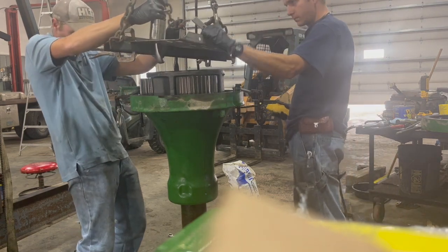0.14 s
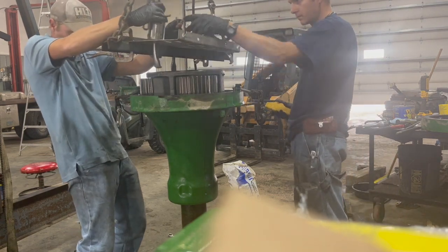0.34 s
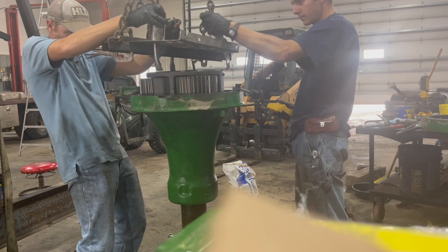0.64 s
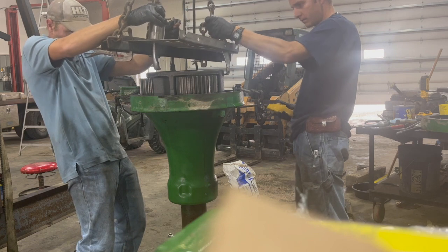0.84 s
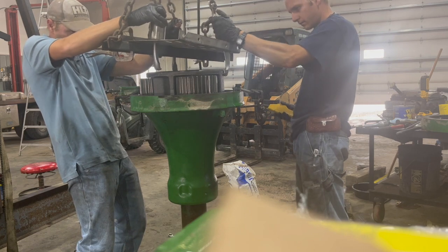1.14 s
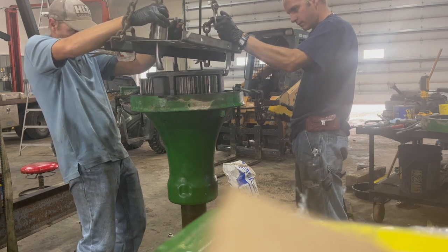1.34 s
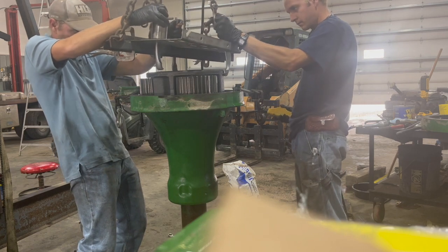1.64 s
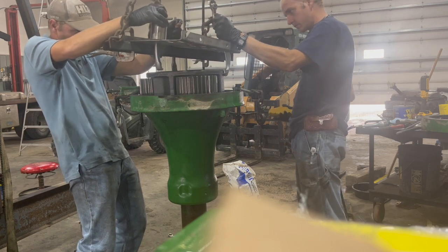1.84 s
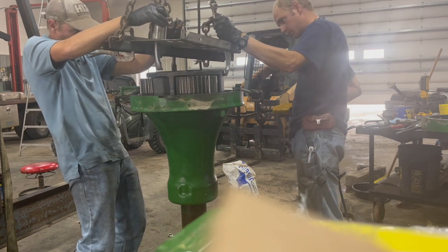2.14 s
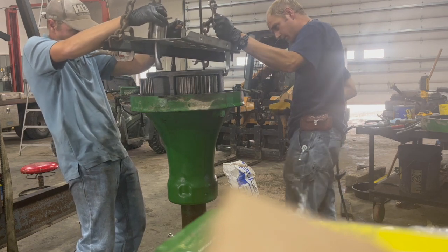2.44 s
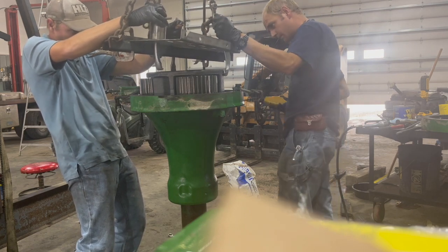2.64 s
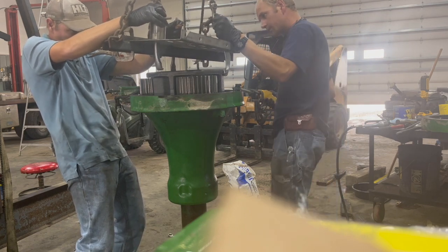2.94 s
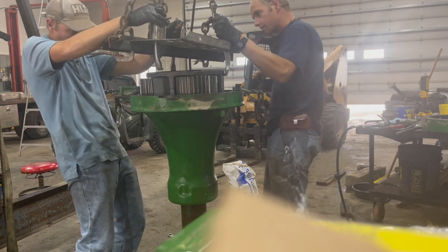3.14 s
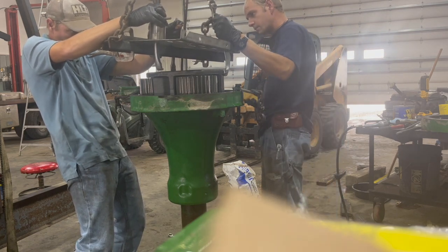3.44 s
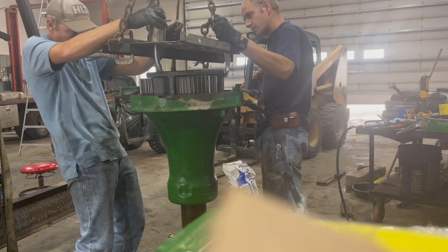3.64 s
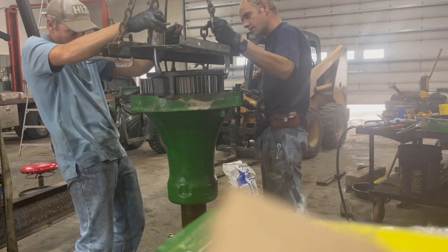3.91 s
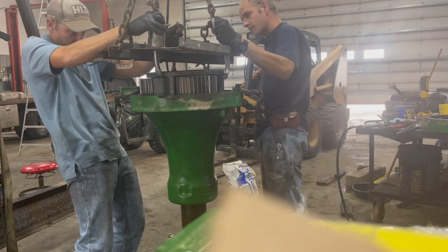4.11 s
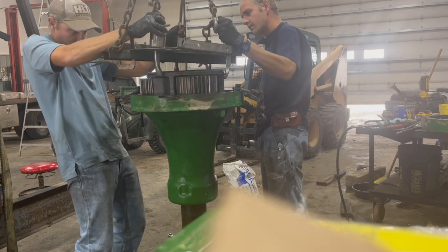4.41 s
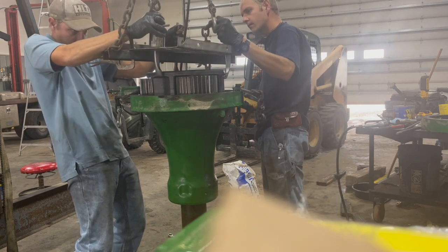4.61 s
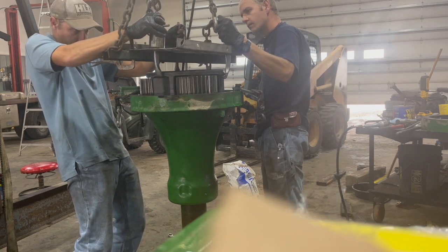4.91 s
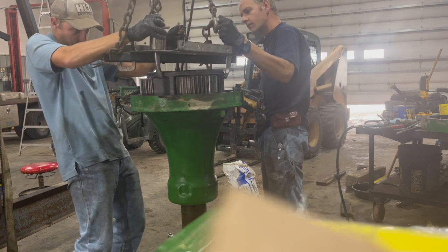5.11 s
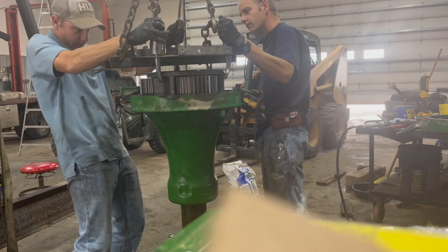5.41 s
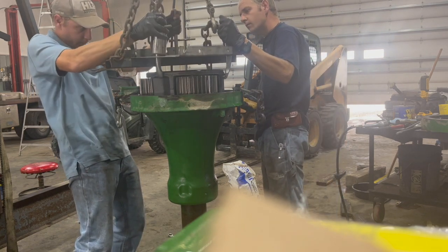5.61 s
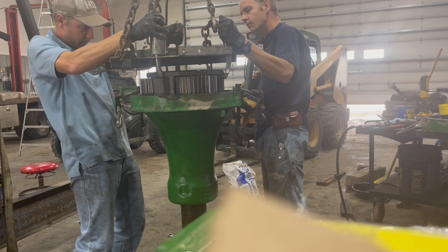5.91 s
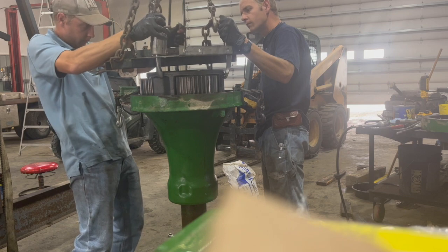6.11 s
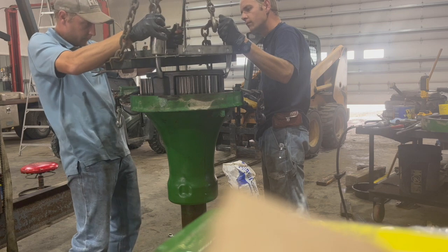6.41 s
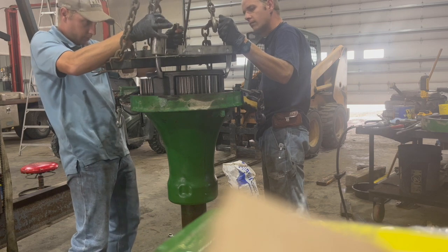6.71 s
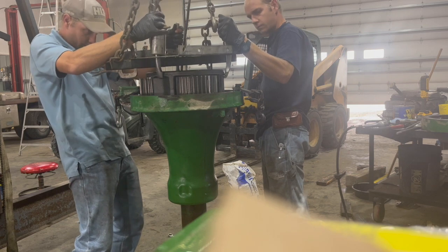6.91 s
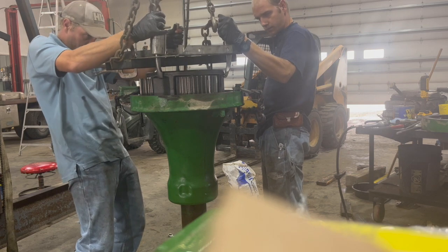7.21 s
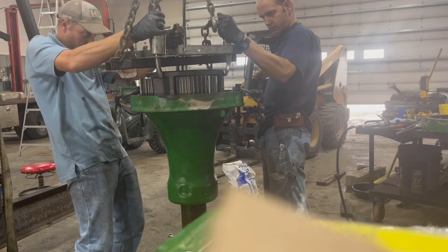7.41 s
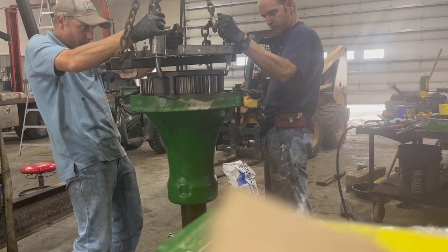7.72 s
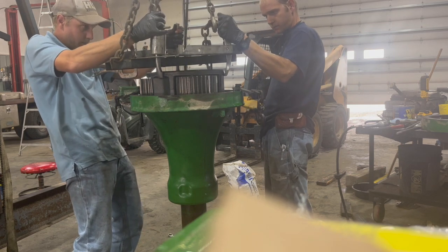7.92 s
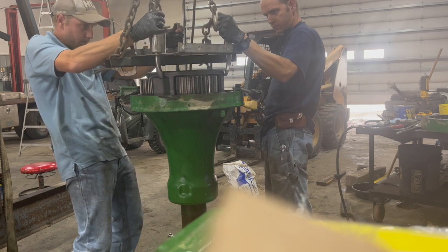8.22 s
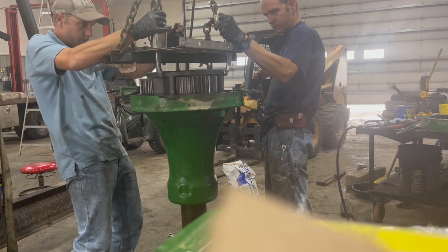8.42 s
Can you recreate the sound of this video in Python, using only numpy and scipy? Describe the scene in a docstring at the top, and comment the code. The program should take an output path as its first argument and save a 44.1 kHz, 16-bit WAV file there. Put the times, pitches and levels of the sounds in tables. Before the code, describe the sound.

Steel scrapes and sharp clanks with chain clinks, between three brief, harsh motor-gear rattles of a chain hoist, ringing in a large hall.

```python
"""A heavy steel part is lowered by short runs of an electric chain hoist in a large metal-walled workshop.
First the steel frame grinds and knocks and chain links clink, as damped modes driven by rough contact.
Then boots and slack chain scuff (filtered grains), the brake clacks (noise bursts) and the gears rattle
(tooth impacts through resonances) in three runs, the last still going at the end, with grinds, knocks and
clinks around them. Air noise and a rumble run throughout; the hall's mid range rings for about 1.5 s."""
import sys
import numpy as np
from scipy import signal
from scipy.fft import rfft, irfft
from scipy.io import wavfile
from scipy.ndimage import uniform_filter1d

SR = 44100
rng = np.random.default_rng(int(sys.argv[2]) if len(sys.argv) > 2 else 0)


def dump(signal):
    """Clip the signal to [-1, 1] and save it as 16-bit WAV at the path in sys.argv[1]."""
    limited = np.clip(np.atleast_2d(signal).T, -1, 1)
    pcm = np.round(limited * 32767).astype(np.int16)
    wavfile.write(sys.argv[1], SR, pcm)


N = 377055

# Levels in the tables are relative: the functions add gains of their own.
# air noise spectrum: [pitch_hz, density_db_per_hz]
AIR = [(53, -31), (90, 7.5), (421, 1), (1500, -1.5), (2300, -26.5), (5110, -23), (6650, -35), (8310, -12),
       (11500, -18.5), (15000, -95), (22000, -120)]
# hall by band: [pitch_hz, t60_s, tail_energy_db, left_right_likeness]
HALL = [(60, 6.8, -1, .95), (256.4, 2.38, 5, 0.69), (660, 1.44, 7.5, -0.033), (1960, 1.68, 2.5, 0.41),
        (4600, 1.35, 9, 0.27), (5920, 1.05, 9.5, -0.2), (8700, 0.67, 5, 0.082), (11700, 0.19, -1, 2),
        (14800, 0.26, 17.5, -1)]
# wall sheets, which ring on longer than the air: [pitch_hz, width_hz, level_db]
CLADDING = [(1526, 80, -8.5), (1678, 88, 0)]
# boots, cloth and slack chain scuffing: [start_s, length_s, level_db, fading_db_per_s]
SCUFFS = [(0, 0.21, -62, 7), (2.02, 0.065, -66, 30), (2.24, 0.027, -68, 30), (2.629, 0.03, -54, -92.5),
          (2.864, 0.083, -68.5, 97.5), (3.12, 0.08, -38, 163.5), (4.185, 0.0047, -39.5, 293),
          (4.235, 0.26, -50, 8.5), (5.595, 0.17, -43.5, 47.5), (5.811, 0.094, -41.5, -74),
          (6.582, 0.12, -60.5, -1), (6.81, 0.11, -60, 43)]
# spectrum of scuffing: [pitch_hz, density_db_per_hz]
SCUFF_SPECTRUM = [(180, -64.5), (300, -20.5), (478, -11), (787, -16.5), (946, -4.5), (1720, -7.5),
                  (9390, -22.5), (12700, -23), (16000, -36)]
# metal parts touching, chain links and hooks but also frame parts that ring low: [start_s, snap_peak_db,
# ring_pitch_hz, ring_over_snap_db, t60_s]
CLINKS = [(0.377, -30.5, 11000, -2, 0.034), (0.381, -34.5, 7860, 5.5, 0.018), (0.386, -43, 4120, 11, 0.067),
          (0.517, -30.5, 5490, -4.5, 0.086), (0.469, -48.5, 3070, 0, 0.18), (.757, -41, 3620, 5, 0.27),
          (0.757, -40, 4330, 6.5, 0.066), (0.956, -13, 5680, -0.5, 0.01), (0.818, -50.5, 1662, 20.5, 0.21),
          (0.961, -53, 1540, 21, 0.2), (3.947, -33, 3120, -2.5, 0.04), (3.969, -16, 3250, -19.5, 0.052),
          (4.111, -21.5, 8210, -1.5, 0.015), (4.143, -20.5, 9420, -10.5, 0.033),
          (4.196, -20.5, 8760, -8.5, 0.035), (4.222, -28, 8000, -25.5, 0.035),
          (4.265, -25, 9100, -21.5, 0.043), (4.388, -34, 9100, -15, 0.03), (4.426, -31.5, 7860, -8, 0.012),
          (4.558, -28, 5420, -9.5, 0.042), (5.228, -26, 3470, -2.5, 0.031), (5.295, -26.5, 3200, 2, 0.046),
          (5.314, -14.5, 9100, -27, 0.033), (5.347, -16.5, 3480, -14.5, 0.039),
          (5.895, -19.5, 7800, -17.5, 0.068), (5.996, -13, 10200, -10.5, 0.04),
          (5.996, -12, 7970, -2, 0.02), (6.006, -18, 8950, -6, 0.045), (5.999, -50, 3350, 6, 0.25),
          (6.002, -44.5, 3740, 3.5, 0.2), (6.001, -51.5, 4130, 7, 0.17), (6.003, -44, 5280, 9.5, .3),
          (7.269, -53.5, 8400, 8.5, 0.092), (7.273, -52, 1595, 20.5, 0.18),
          (7.274, -59.5, 1314, 21.5, 0.43), (7.273, -52.5, 472, 16, 0.23), (7.275, -68, 2240, 10, 0.26),
          (7.276, -67, 4360, 12, 0.26), (7.999, -47, 5370, -11, .05), (8.4, -16, 5230, -59, 0.032),
          (8.442, -35, 7900, 4, 0.037), (8.496, -11, 4050, -15, 0.01)]
# steel frame grinding on its seat: [peak_s, peak_db, swell_ms, fall_ms, mode_tilt_db_per_octave]
GRINDS = [(.04, -47, 1000, 54, -6), (0.199, -22.5, 108, 40, 1.5), (.388, -28.5, 50, 32, 5.5),
          (0.492, -30.5, 83, 67, -5.5), (0.512, -23, 37, 58, 4), (0.711, -19, 85, 65, 4),
          (.78, -37, 14, 27, 10), (2.12, -53.5, 50, 40, -1), (5.111, -17.5, 45, 38, -1),
          (5.542, -13.5, 93, 38, 6), (6.029, -16, 48, 26, -1), (7.271, -25.5, 53.6, 29, -1.5),
          (8.128, -23.5, 47, 260, -7)]
# knocks on the frame: [start_s, peak_db, struck_pitch_hz, length_ms, bright_tick_db]
KNOCKS = [(0.115, -42, 610, 5.1, -19), (0.345, -21.5, 2300, 9.5, -26), (0.463, -15, 710, 7.7, -27.5),
          (0.465, -12.5, 2300, 4.1, -24), (0.485, -24.5, 680, 6.6, -31), (0.505, -13, 690, 21, -17),
          (0.715, -14, 2240, 25, -31), (0.752, -3.5, 2230, 16, -14.5), (0.961, -5.5, 840, 10.6, -19),
          (1.355, -27.5, 2300, 25, -33), (2.43, -61, 3870, 10.6, -46), (2.606, -26, 1675, 8.4, -34),
          (3.118, -52, 1210, 9.9, -40.5), (4.988, -9.5, 1270, 10, -29.5), (5.345, -1, 2240, 19, -13),
          (5.538, 2, 2020, 19.2, 4), (5.89, 7.5, 1820, 10.5, -12), (5.994, 2, 3920, 6.6, -2),
          (5.996, 1.5, 2100, 12.3, -13), (6.544, -13, 2370, 8.9, -28.5), (6.563, -26, 900, 6.9, -30),
          (6.77, -20.5, 2000, 2.7, -24), (7.234, -20.5, 1070, 13, -22), (7.27, -11, 2140, 10, -19),
          (8.496, 1.5, 2330, 8.8, -2.5)]
# frame modes, damped by hands and seat: [pitch_hz, level_db, t60_s]
FRAME_MODES = [(259.5, -25, 0.071), (478, -21.5, 0.064), (587, -11.5, 0.06), (634, -15.5, 0.032),
               (689, -3, 0.055), (794, -17.5, 0.12), (1000, -6, 0.015), (1170, -5.5, 0.033),
               (1282, 1, 0.018), (1610, -6, .025), (1800, -7.5, 0.019), (2032, -6, 0.017),
               (2133, -11, 0.024), (2213, -3.5, 0.023), (2300, -9.5, 0.023), (2570, -19.5, 0.016),
               (3030, -9, 0.012), (3650, -14.5, 0.03), (3950, -20.5, 0.022), (4450, -17, 0.034),
               (5260, -17, 0.018)]
# brake and other dull blows: [start_s, thud_peak_db, snap_db, thump_pitch_hz, thump_db, length_ms]
THUDS = [(2.61, -45.5, -53, 360, -60, 69), (3.095, -41, -32, 183, -23, 30),
         (3.395, -13.5, 0.5, 341, -15, 41), (4.981, -21.5, -10, 431, -35.5, 94),
         (8.036, -10.5, 4, 347, -14.5, 26.5)]
# resonances of a thud's body: [pitch_hz, width_hz, level_db]
THUD_BODY = [(210, 210, -4.5), (340, 330, 2.5), (454, 140, -1), (760, 140, -25), (1290, 160, -27)]
# hoist runs: [start_s, stop_s, rattle_db, surge_db, upper_over_rattle_db, upper_drift_db_per_s,
#              hum_db, boom_over_rattle_db, boom_drift_db_per_s]
RUNS = [(3.399, 3.999, -31, 8.5, 2, 14.5, -59, -6.5, -11.5), (5.063, 5.527, -32.5, 7, 8, -27, -47, -10, 8),
        (8.039, 8.593, -30.5, 6, -3.5, -4, -37, -5.5, 5)]
# the load jerking on the gears: [centre_s, added_rattle_db, further_upper_resonance_db]
LURCHES = [(3.49, 2.7, 2), (3.69, 0.44, 2.5), (3.87, 1.8, 2.5), (5.239, 5.6, -1.5), (8.129, 5.9, 2),
           (8.453, 6.7, -5)]
# main, upper and case resonances of the gears: [pitch_hz, width_hz, level_db]
GEARBOX = [(774, 147, 1), (929, 33, 6), (1090, 148, 1), (2056, 470, -6), (2880, 500, -10.5),
           (4560, 930, -14.5), (5760, 1000, -18), (9150, 8400, -26.5)]
UPPER_GEAR = [(1154, 46, -15), (1241, 73, -0.5), (1283, 44, -1.5), (1353.6, 40, 5), (1426, 62, -0.5),
              (1570, 71, -11.5)]
CASE = [(114, 21, -2.5), (247.5, 27.4, -1.5), (354.7, 18.4, 5), (472, 74, -4.5)]
# colour of the output, with a treble dip and a deep gap near 13 kHz: [pitch_hz, level_db]
OUT_COLOUR = [(30, -10.5), (200, 2), (5500, -3.5), (6700, -7), (8000, -1.5), (11000, -5.5), (11800, -19.5),
              (13200, -62.5), (14200, -12), (16000, -3.5)]
# left channel over right: [pitch_hz, difference_db]
SIDES = [(60, 0), (180, -2), (500, 0), (1000, 0.5), (2000, -0.1), (4000, 6), (8000, 0.5)]

AIR_DB = -65.5
# the building rumbles along with the work: level at full scale, share of the swing, smoothing
RUMBLE_DB, RUMBLE_FOLLOWS, RUMBLE_S = -38, 0.4, 0.014
RUMBLE_REST = 3e-6   # power that keeps it going in the pauses
NEAR_T60_S, NEAR_DB = 0.11, -1   # reflections off nearby machines
CLADDING_T60_S = 1.69
CLOSE_WET_DB = -5.5   # frame and chain are nearer than the hoist: less hall
TOUCH_MS = 4.3
LINKS_HZ, LINKS_T60_S, LINKS_DB = (3000, 11500), .007, -19   # the many other links: range, ring, level
TWIN_RATIO, TWIN_DB = 0.975, -7   # every part has a second mode close by, so its ring beats
# loose parts swing and brush, so their ring wavers in level and phase
FLUTTER_DB, FLUTTER_RAD, FLUTTER_S = 5, 1.1, .025
CONTACT_DB = 18   # the surfaces first touch this far below the peak
GRIND_DULLS = 0.55   # tilt lost per dB below the peak
SCRATCH_DB = 19   # toneless part of each contact
TICK_WIDTH = 0.37   # width of a knock's tick over the struck pitch
# from here the frame rests on its seat, which weakens the low modes
SEATED_S, SEATED_BELOW_HZ, SEATED_DB = 5.3, 1250, -7
THUMP_T60_S, THUMP_FROM_HZ, THUMP_SAG_S = .04, 593, 0.0028   # the thump starts at one pitch, glides to its own
SURGE_S, SURGE_MASKS = 0.14, 1   # the surge dies away; share by which the upper resonance holds back
WIND_UP_S, WIND_UP_DB = 0.029, -33   # the hum comes up to strength
STOP_S, STOP_DB, STOP_UPPER_DB = 0.083, 6, -17   # as the brake bites: more rattle, less upper resonance
LURCH_S = 0.027
HUM_HZ = 135.5
SHAFT_HZ, SHAFT_KICK_S = 30.24, 3.445   # motor turns per second; a moment when the tight tooth meets
WANDER_DB, WANDER_S = 3, 0.03   # each upper resonance comes and goes by itself
TOP, CUTOFF_HZ = .9, 16600   # the loudest peaks are rounded; the top is cut


def from_db(db):
    """Decibels are twenty times the logarithm of a gain; this inverts them."""
    return 10 ** (np.asarray(db) / 20)


def rms_one(x):
    """Normalise by the root of the mean power."""
    return x / np.sqrt(np.mean(x ** 2) + 1e-20)


def at_hz(points, hz, axis=1):
    """Interpolate a table column over log frequency, since pitch is heard in ratios."""
    points = np.array(points)
    return np.interp(np.log(hz), np.log(points[:, 0]), points[:, axis])


def strokes(starts, stops, db, fade_s):
    """Amplitude gating: each row of db sounds from start to stop, with linear fades outside."""
    t = np.arange(N) / SR
    total = 0
    for start, stop, row in zip(starts, stops, db):
        total = total + from_db(row) * np.clip(np.minimum(t - start, stop - t) / fade_s + 1, 0, 1)
    return total


def colour(x, points):
    """Minimum-phase filtering: folding the cepstrum puts the response's energy earliest."""
    hz = np.maximum(np.arange(2049) * SR / 4096, 1)
    cepstrum = irfft(np.log(from_db(at_hz(points, hz))))
    cepstrum[1:2048] *= 2
    cepstrum[2049:] = 0
    response = irfft(np.exp(rfft(cepstrum))) * np.ones(np.shape(x)[:-1] + (1,))
    return signal.oaconvolve(x, response, axes=-1)[..., :N]


def resonate(x, peaks):
    """Modal superposition: parallel two-pole resonances with alternating signs."""
    out = 0
    for k, (hz, width, db) in enumerate(peaks):
        r = np.exp(-np.pi * width / SR)
        zeros = (1 - r * r) / 2 * np.array([1, 0, -1])
        poles = [1, -2 * r * np.cos(2 * np.pi * hz / SR), r * r]
        out = out + (-1) ** k * from_db(db) * signal.lfilter(zeros, poles, x + 1e-18)
    return out


def ring(clicks, hz, t60):
    """Impulse response of a damped oscillator: a unit click starts a decaying sine of height 1."""
    r = from_db(-60 / (t60 * SR))
    w = 2 * np.pi * min(hz, .45 * SR) / SR
    return signal.lfilter([0, np.sin(w)], [1, -2 * r * np.cos(w), r * r], clicks + 1e-18)


def grains(per_s, spread_db):
    """Shot noise: random contacts of uneven size, at rms 1."""
    sizes = from_db(spread_db * np.minimum(rng.exponential(1, N), 5)) * rng.choice([-1, 1], N)
    return rms_one(sizes * (rng.random(N) < per_s / SR))


def blows(times, dbs, lengths_ms, rise):
    """Impact envelope: a rise over a share of the length, and a fall of 20 dB per length."""
    out = np.zeros(N)
    ms = np.arange(SR // 4) / SR * 1000
    for s, db, length in zip(times, dbs, np.maximum(lengths_ms, .5)):
        i = round(s * SR)
        envelope = from_db(db - 20 * ms / length) * np.minimum(ms / (rise * length), 1)
        out[i:i + len(ms)] += envelope[:N - i]
    return out


def background(work):
    """Broadband air noise, plus a low rumble modulated by the smoothed power of the work."""
    mid, side = rng.standard_normal((2, N))
    air = rms_one(colour(np.array([mid + 0.33 * side, mid - 0.43 * side]), AIR))
    low_band = signal.butter(2, [48, 85], "band", fs=SR, output="sos")
    low_mid, low_side = signal.sosfilt(low_band, rng.standard_normal((2, N)))
    rumble = rms_one(low_mid + 0.21 * low_side * [[1], [-1]])
    keep = np.exp(-1 / (RUMBLE_S * SR))
    power = signal.lfilter([1 - keep], [1, -keep], np.mean(work ** 2, axis=0)) + RUMBLE_REST
    return from_db(AIR_DB) * air + from_db(RUMBLE_DB) * power ** (RUMBLE_FOLLOWS / 2) * rumble


def hall(close, rings, far):
    """Diffuse-field reverberation: direct sound, near reflections and a tail decaying band by band."""
    t = np.arange(2 * SR) / SR
    edges = 40 * 2 ** np.arange(0, 9.1, .5)   # half octaves
    white = rng.standard_normal((2, 2, len(t)))
    near, tail = np.zeros((2, len(t))), 0
    for k, (low, high) in enumerate(zip(edges, edges[1:])):
        band_pass = signal.butter(2, [low, high], "band", fs=SR, output="sos")
        mid, side = signal.sosfilt(band_pass, white[k % 2])
        t60, tail_db, alike = [at_hz(HALL, np.sqrt(low * high), axis=c) for c in (1, 2, 3)]
        alike = np.clip(alike, -1, 1)
        band = np.sqrt(1 + alike) * mid + np.sqrt(1 - alike) * side * [[1], [-1]]
        band = band * np.sqrt(np.log(1000) / SR)   # with 1/sqrt(t60): energy independent of decay
        near += band * from_db(NEAR_DB - 60 * t / NEAR_T60_S) / np.sqrt(NEAR_T60_S)
        build_up = np.minimum(t / 0.0087, 1)
        tail = tail + band * from_db(tail_db - 60 * t / t60) * build_up / np.sqrt(t60)
    sheets = resonate(white[0], CLADDING) * from_db(-23.0 - 60 * t / CLADDING_T60_S)
    near[:, 0] = 1   # direct sound
    sent = far + from_db(CLOSE_WET_DB) * close
    light = from_db(CLOSE_WET_DB) * rings   # too light to shake the wall sheets
    paths = [(close + rings + far, near[:, :SR // 4]), (sent, tail + sheets), (light, tail)]
    return sum(signal.fftconvolve(x, response, axes=-1)[:, :N] for x, response in paths)


def scuffs():
    """Friction as dense random contacts: fine grit rubbed over concrete and steel."""
    s, length, db, fading = np.transpose(SCUFFS)[..., None]
    level = db - fading * np.clip(np.arange(N) / SR - s, 0, length)
    grit = rms_one(colour(grains(9000, spread_db=9.5), SCUFF_SPECTRUM))
    return strokes(s, s + length, level, fade_s=0.034) * grit


def chain():
    """Impact excitation: each touch snaps, rings one part clearly and shakes many links faintly."""
    s, db, hz, ring_db, t60 = np.transpose(CLINKS)
    touch = blows(s, db, np.full(len(s), TOUCH_MS), rise=1.0) * rng.standard_normal(N)
    snap_spectrum = [(1000, -35.0), (4000, -5.5), (9000, -31.0), (16000, 15.5)]
    out = from_db(-3.5) * colour(touch, snap_spectrum)
    for link_hz in np.geomspace(*LINKS_HZ, 40):
        out += ring(from_db(LINKS_DB) * touch * rng.standard_normal(N), link_hz, LINKS_T60_S)

    sway = uniform_filter1d(rng.standard_normal((2, N)), size=int(FLUTTER_S * SR))
    sway = rms_one(uniform_filter1d(sway, size=int(FLUTTER_S * SR / 2)))
    waver = from_db(FLUTTER_DB * sway[0]) * np.exp(1j * FLUTTER_RAD * sway[1])
    for k, i in enumerate((s * SR).astype(int)):
        t = np.arange(min(SR, N - i)) / SR
        own = np.roll(waver, i * k)[:len(t)]   # another stretch of wavering for each part
        own = own * np.exp(-1j * np.angle(own[0]))   # start at phase zero
        twin = from_db(TWIN_DB) * np.exp(2j * np.pi * TWIN_RATIO * hz[k] * t)
        pair = np.exp(2j * np.pi * hz[k] * t) + twin
        out[i:i + len(t)] += from_db(db[k] + ring_db[k] - 60 * t / t60[k]) * np.imag(pair * own)
    return out


def grinding():
    """Contact pressure swells and falls 20 dB per span; lighter pressure sounds duller."""
    s, db, swell_ms, fall_ms, tilt_db = np.transpose(GRINDS)[..., None]
    ms = (np.arange(N) / SR - s) * 1000
    below = 20 * np.maximum(-ms / swell_ms, ms / fall_ms)   # dB under the peak
    touching = np.clip(np.where(ms < 0, CONTACT_DB - below, 1), 0, 1)
    gains = from_db(db - below) * touching
    pressure = gains.sum(axis=0)
    tilt = (gains * from_db(tilt_db - GRIND_DULLS * below)).sum(axis=0) / (pressure + 1e-30)
    return pressure, tilt


def frame():
    """Modal excitation: grinding and knocking drive the same damped modes."""
    s, db, struck_hz, ms, _ = np.transpose(KNOCKS)
    seated = from_db(SEATED_DB * (np.arange(N) > SEATED_S * SR))
    pressure, tilt = grinding()   # tilt as gain per octave
    grind = from_db(-27.5) * pressure * grains(1500, spread_db=3.0)
    contacts, out = grains(6000, spread_db=4.0), 0
    for hz, level_db, t60 in FRAME_MODES:
        # modes far from the struck region answer less
        struck_db = db - 23.5 - 1.96 * np.abs(np.log2(hz / struck_hz))
        rubbed = grind * np.clip(tilt, .2, 5) ** np.log2(hz / 1200)
        struck = blows(s, struck_db, ms, rise=1.0) * contacts
        drive = (rubbed + struck) * rng.standard_normal(N)
        if hz < SEATED_BELOW_HZ:
            drive = drive * seated
        out = out + from_db(level_db) * ring(drive, hz, t60)
    push = grind + blows(s, db - 31.0, ms, rise=0.29) * contacts
    scratch = colour(push, [(150, -21.5), (500, 1.0), (2200, 8.5), (4000, -3.0), (12000, -18.5)])
    return out + from_db(SCRATCH_DB) * scratch


def ticks():
    """Impulsive onset: each knock opens with a short crack centred on the struck pitch."""
    out = np.zeros(N)
    ms = np.arange(SR // 20) / SR * 1000
    noises = rng.standard_normal((len(KNOCKS), len(ms)))
    for (s, _, hz, length, db), noise in zip(KNOCKS, noises):
        i = round(s * SR)
        crack = resonate(from_db(db - 20 * ms / length) * noise, [(hz, TICK_WIDTH * hz, 0)])
        out[i:i + len(ms)] += crack[:N - i]
    return out


def thuds():
    """Dull impact: a thump gliding in pitch, a resonant noise body and a broad snap."""
    s, thud_db, snap_db, hz, thump_db, ms = np.transpose(THUDS)
    body = rms_one(resonate(rng.standard_normal(N), THUD_BODY))
    snap = colour(rng.standard_normal(N), [(500, -49), (3000, -5.5), (15000, -11.5)])
    out = from_db(-9.0) * blows(s, thud_db, ms, rise=0.027) * body
    out += blows(s, snap_db, 0.35 * ms, rise=0.29) * snap
    t = np.arange(SR // 8) / SR
    for at, db, thump_hz in zip(s, thump_db, hz):
        glide = (THUMP_FROM_HZ - thump_hz) * THUMP_SAG_S * (1 - np.exp(-t / THUMP_SAG_S))
        thump = from_db(db - 60 * t / THUMP_T60_S) * np.sin(2 * np.pi * (thump_hz * t + glide))
        out[round(at * SR):][:len(t)] += thump
    return out


def motor():
    """Load-dependent excitation: gains of rattle, upper resonance, case boom and hum over the runs."""
    (start, stop, rattle_db, surge_db, upper_db, upper_drift,
     hum_db, boom_db, boom_drift) = np.transpose(RUNS)[..., None]
    t = np.arange(N) / SR
    since = np.clip(t - start, 0, stop - start)
    surge = surge_db * np.exp(-(since / SURGE_S) ** 2)
    braking = np.exp(-np.maximum(stop - t, 0) / STOP_S)
    jerk, rasp = sum(np.outer(dbs, np.exp(-((t - s) / LURCH_S) ** 2)) for s, *dbs in LURCHES)
    rattle = rattle_db + surge + jerk + STOP_DB * braking
    upper = upper_db + upper_drift * since - SURGE_MASKS * surge + rasp + STOP_UPPER_DB * braking
    boom = boom_db + boom_drift * since
    drone = hum_db + WIND_UP_DB * np.exp(-(since / WIND_UP_S / 2) ** 2)
    return (strokes(start, stop, rattle, fade_s=0.021),
            strokes(start, stop, rattle + upper, fade_s=0.013),
            strokes(start, stop, rattle + boom, fade_s=0.011),
            strokes(start, stop, drone, fade_s=.08))


def hum(drone):
    """Phase-modulated sine: the motor's low tone, slightly unsteady, leading on one side."""
    unsteady = 1.0 * rms_one(uniform_filter1d(rng.standard_normal(N), size=4000))   # radians
    phase = 2 * np.pi * HUM_HZ * np.arange(N) / SR + unsteady
    return np.sqrt(2) * drone * np.sin(phase + np.array([[.3], [-.3]]))


def hoist(rattle, upper_gain, boom):
    """Source and resonator: tooth contacts, harder once a turn, shake the gears and their case."""
    turn = np.cos(np.pi * SHAFT_HZ * (np.arange(N) / SR - SHAFT_KICK_S)) ** 2
    teeth = grains(900, spread_db=3.0) * from_db(8.1 * turn ** 13.0)
    wander = uniform_filter1d(rng.standard_normal((len(UPPER_GEAR), N)), size=int(WANDER_S * SR))
    upper = 0
    for k, peak in enumerate(UPPER_GEAR):
        wandering = teeth * from_db(WANDER_DB * rms_one(wander[k]))
        upper = upper + (-1) ** k * resonate(wandering, [peak])
    upper = resonate(upper, [(1330, 540, 0)])   # steep skirts
    gears = rattle * rms_one(resonate(teeth, GEARBOX))
    case = boom * rms_one(resonate(teeth, CASE))
    return from_db(-4.0) * (gears + upper_gain * rms_one(upper) + case)


def scene():
    """Superposition: hoist overhead, frame and chain in front, all but the hum and background in the hall."""
    rattle, upper, boom, drone = motor()
    far = hoist(rattle, upper, boom) * from_db([[-.5], [.5]]) + scuffs()
    close = (frame() + ticks() + thuds()) * from_db([[.3], [-.3]])
    work = hall(close, np.array([chain()]), far)
    return work + hum(drone) + background(work)


def record(dry):
    """Ports shaded unevenly by the body and a treble dip, then rounded peaks and a cut top; the treble also has
    a deep gap near 13 kHz."""
    half = np.array(SIDES) * [1, .5]   # each side takes half the difference
    shaded = np.array([colour(dry[0], half), colour(dry[1], half * [1, -1])])
    rounded = TOP * np.tanh(colour(shaded, OUT_COLOUR) / TOP)
    low_pass = signal.cheby2(12, 70, CUTOFF_HZ, fs=SR, output="sos")
    return signal.sosfilt(low_pass, rounded)


dry = scene()
out = record(dry)
dump(out)
```